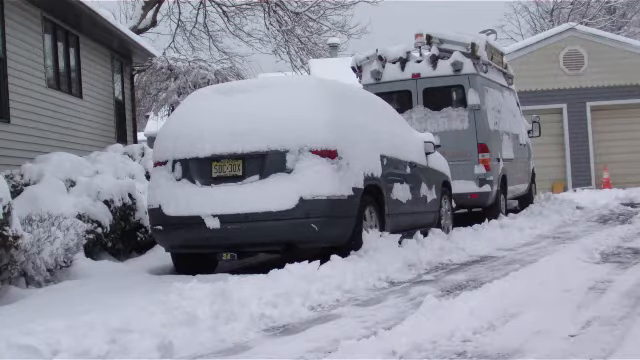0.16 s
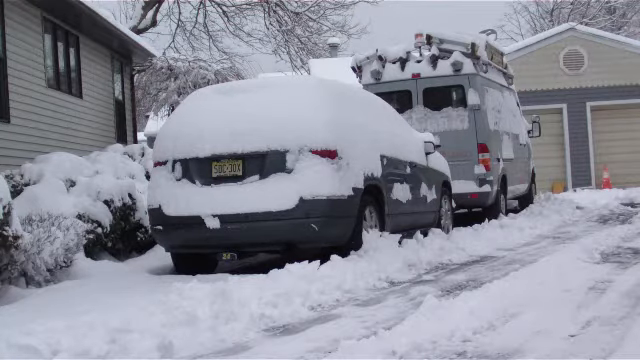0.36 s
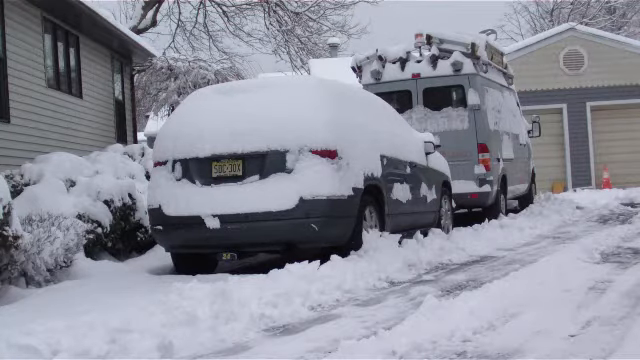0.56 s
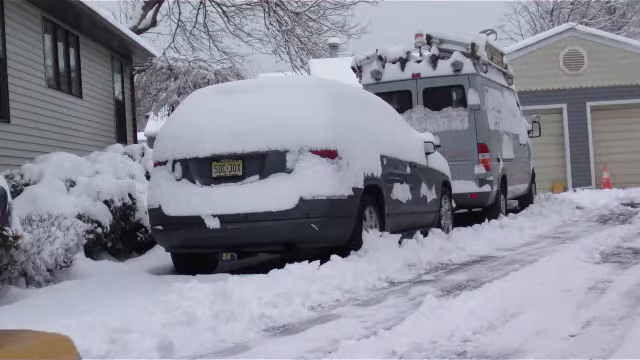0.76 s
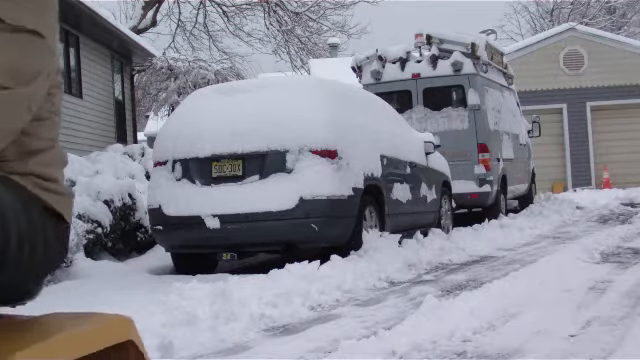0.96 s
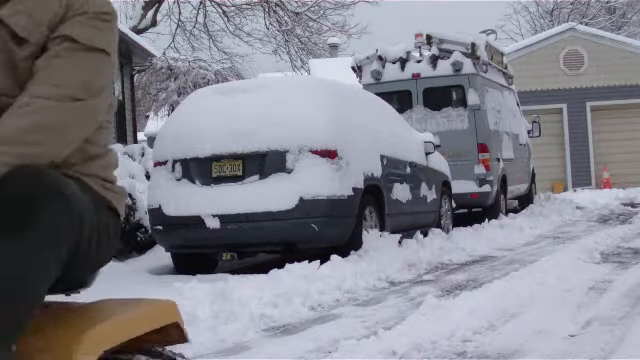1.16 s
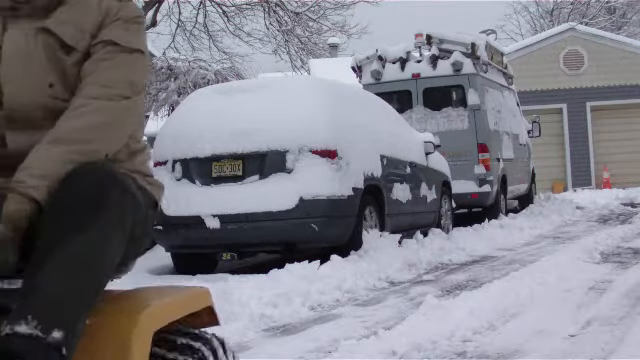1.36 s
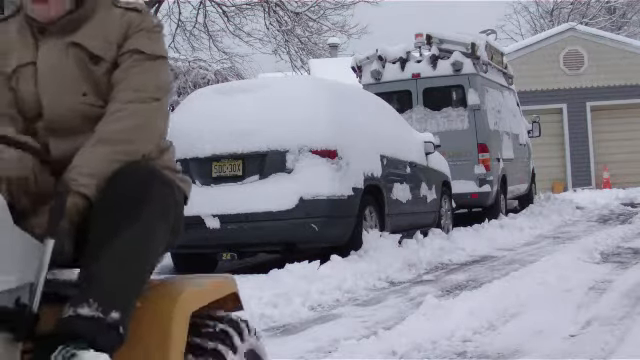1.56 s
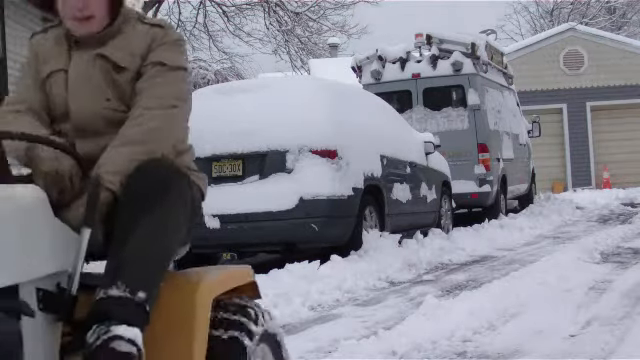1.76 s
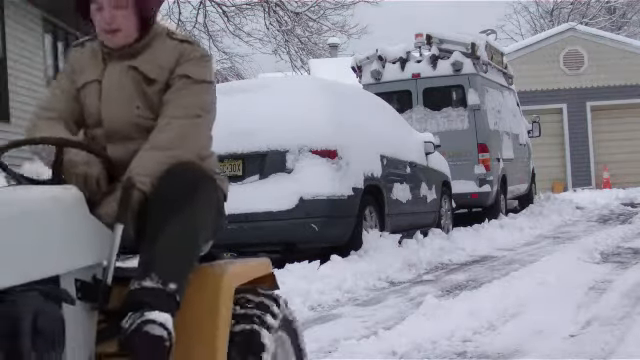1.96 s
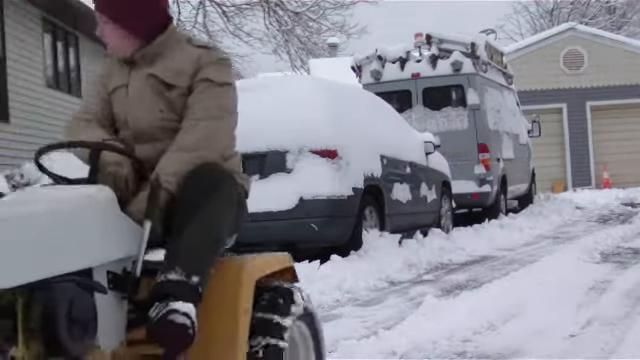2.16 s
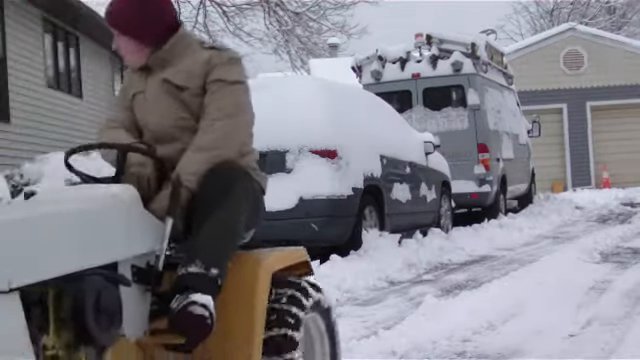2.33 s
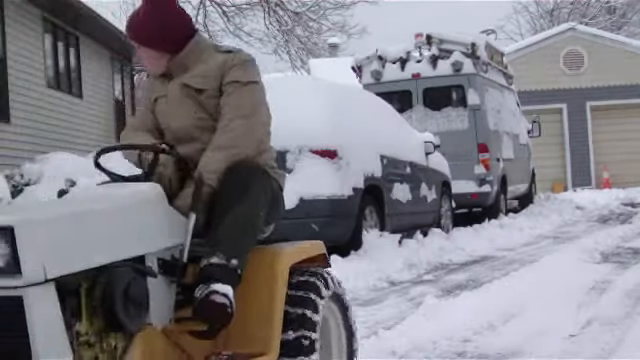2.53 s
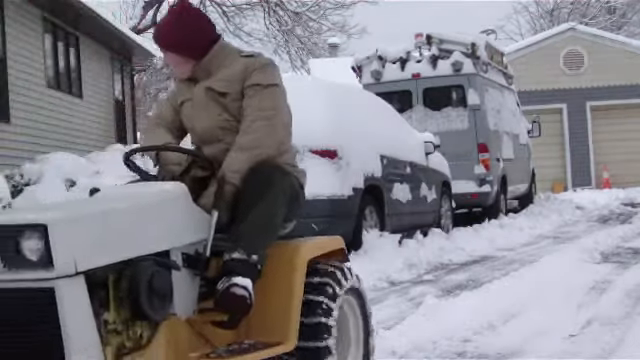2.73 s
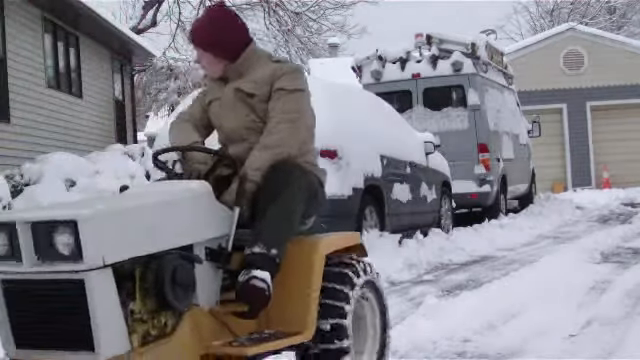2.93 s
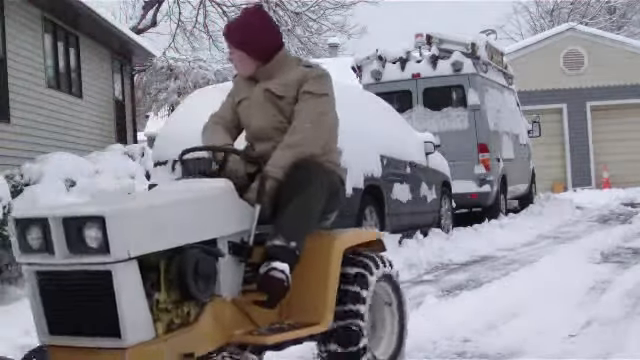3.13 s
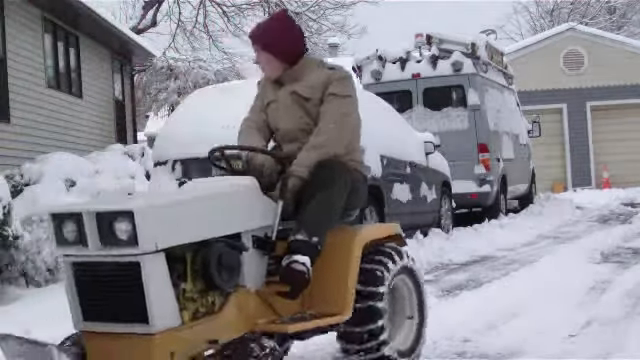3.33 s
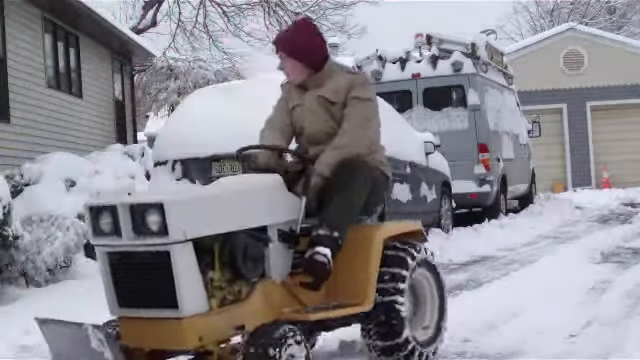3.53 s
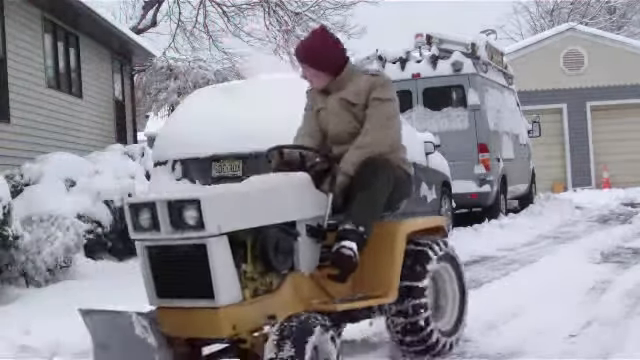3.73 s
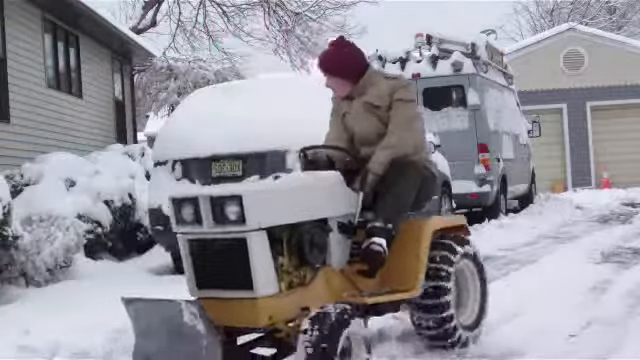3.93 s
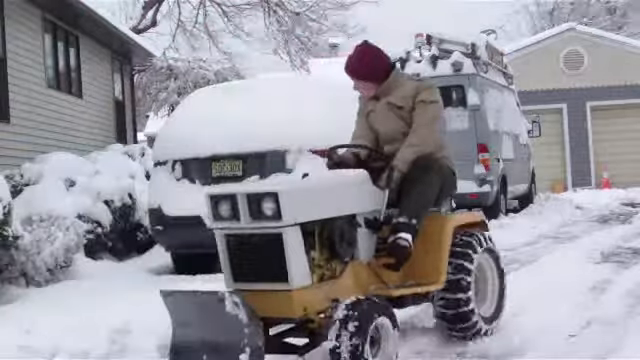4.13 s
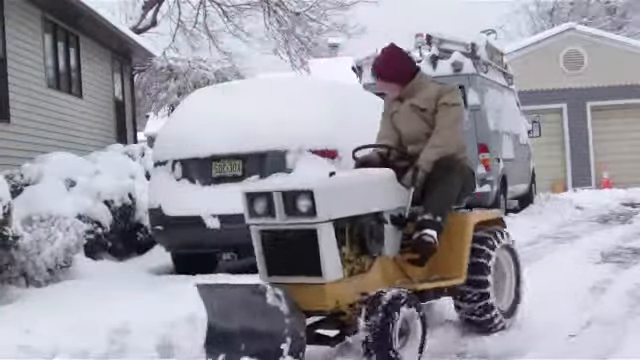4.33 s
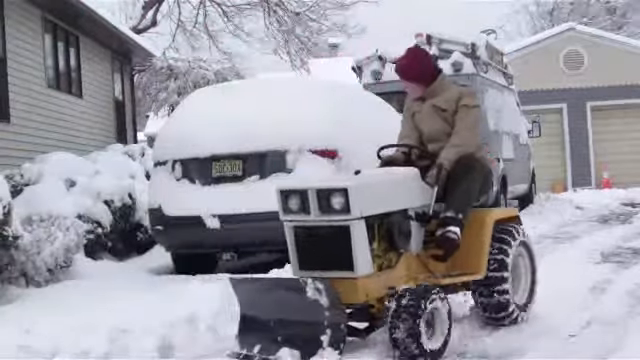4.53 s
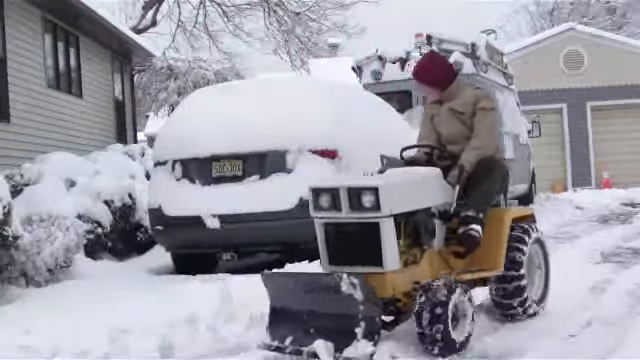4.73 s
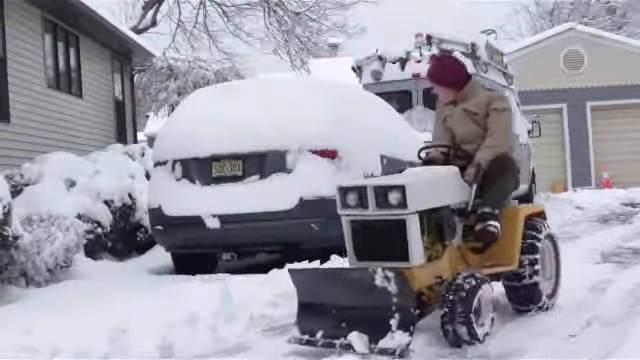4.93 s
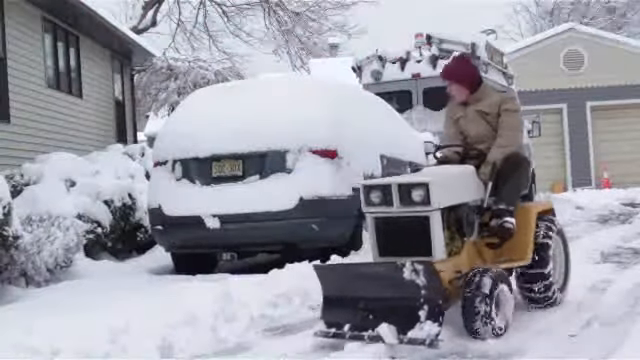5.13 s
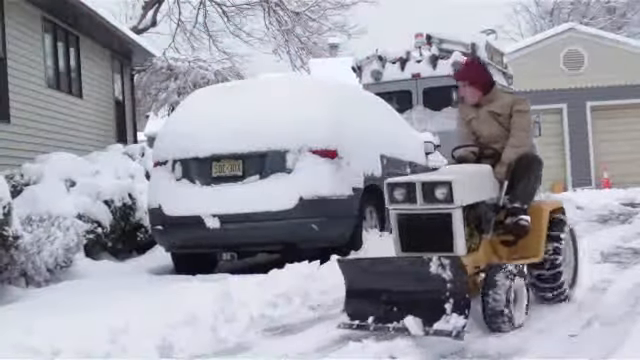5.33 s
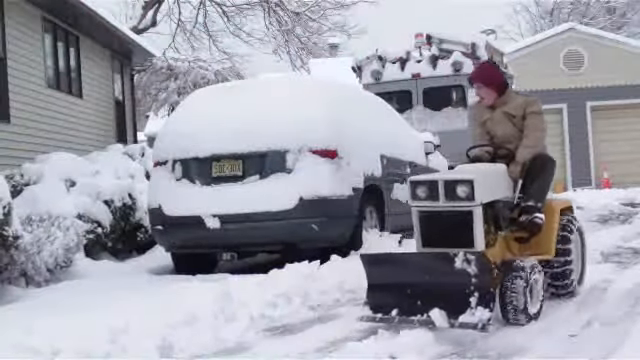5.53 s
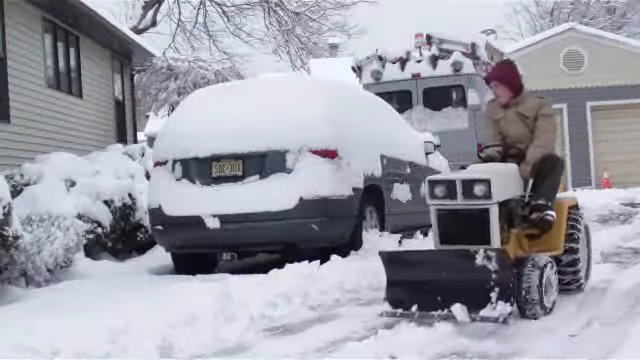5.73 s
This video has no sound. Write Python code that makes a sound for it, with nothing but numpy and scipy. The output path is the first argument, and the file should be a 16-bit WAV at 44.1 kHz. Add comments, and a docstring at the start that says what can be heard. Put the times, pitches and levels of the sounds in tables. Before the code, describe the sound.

A garden tractor with a snow blade passes close by, its engine thumping and belt chirping, then fades amid hissing snow and clinking tyre chains.

```python
"""Exhaust thumps, belt chirps and snow hiss swell and fade as a garden tractor backs past close by with its blade.
Each four-stroke cycle of its single cylinder sets off a resonant exhaust thump with a spit of gas,
two chirps of a belt with overtones and a gulp of intake air; casing and fan ring with rattle and knocks.
Each engine part swells as it comes abreast and fades with distance; intake and belt also fade behind bodywork.
Grainy noise makes the snow hiss in shoves, tyre chains clink, and the loudest peaks round off."""
import sys
import numpy as np
from scipy import signal
from scipy.fft import rfft, irfft
from scipy.io import wavfile

SR = 44100
rng = np.random.default_rng(int(sys.argv[2]) if len(sys.argv) > 2 else 0)


def generate_wav(signal):
    """Clip the signal to [-1, 1] and save it as 16-bit WAV at the path in sys.argv[1]."""
    frames = np.transpose(np.atleast_2d(signal))
    scaled = np.clip(frames, -1, 1) * 32767
    pcm = np.round(scaled).astype(np.int16)
    wavfile.write(sys.argv[1], SR, pcm)


N = 254898

# the governor hunts slowly: (time [s], engine cycles [1/s])
SPEED = [(0.0, 20.17), (0.44, 20.3), (1.13, 19.82), (1.33, 20.18), (2.38, 20.43), (3.96, 19.78),
         (5.03, 20.36), (5.4, 20.76), (5.78, 20.33)]
# how the tractor stands to the listener: (time [s], facing [0 = close and side on, 1 = seen from the front])
FACING = [(0, 0), (1.7, 0), (2.8, .45), (4, 1), (5.78, 1)]
# the engine pulls hard for a moment
PULL_AT_S, PULL_HALF_S = 0.64, 0.43


def amp(db):
    """Decibels to gain."""
    return 10 ** (np.asarray(db) / 20)


def unit(x):
    """Scales to rms 1."""
    return x / np.sqrt(np.mean(x ** 2) + 1e-20)


def curves(rows):
    """Each column of a table, after the time, as a value per sample."""
    s, *columns = np.transpose(rows)
    return [np.interp(np.arange(N) / SR, s, c) for c in columns]


def colour(x, points):
    """Filters by a spectrum drawn on a log-frequency axis, then scales to rms 1."""
    hz, db = np.transpose(points)
    f = np.fft.rfftfreq(N, 1 / SR)
    gain = amp(np.interp(np.log(f + 1), np.log(hz), db))
    return unit(irfft(rfft(x) * gain, N))


def wander(hz):
    """Smooth random drift of rms 1 that changes up to about hz times a second."""
    f = np.fft.rfftfreq(N, 1 / SR)
    lowpass = np.exp(-(f / hz) ** 2)
    return unit(irfft(rfft(rng.standard_normal(N)) * lowpass, N))


def resonate(x, hz, width):
    """One band-pass resonance of gain 1 at its centre; width in Hz."""
    return signal.lfilter(*signal.iirpeak(hz, hz / width, SR), x)


def ring(x, modes):
    """A body with several resonances, scaled to rms 1."""
    body = np.zeros(N)
    for hz, width, db in modes:
        # two passes narrow the peak, so each one is made wider
        once = resonate(x, hz, 2.4 * width)
        body += amp(db) * resonate(once, hz, 2.4 * width)
    return unit(body)


def stroke(cycle, at, length):
    """A smooth bump once a cycle, placed and sized in fractions of the cycle."""
    offset = (cycle - at + .5) % 1 - .5
    return np.exp(-(offset / length) ** 2)


def puff(cycle, at, length):
    """Once a cycle, a quick rise and a slower fall; times in fractions of the cycle."""
    age = (cycle - at) % 1 / length
    return age * np.exp(1 - age)


def per_cycle(cycle, spread_db):
    """A random gain for each cycle."""
    gains = amp(spread_db * rng.standard_normal(512))
    return gains[cycle.astype(int)]


def grains(per_s, spread_db):
    """Random clicks of either sign, mostly small and a few large, scaled to rms 1."""
    size = amp(spread_db * np.minimum(rng.exponential(1, N), 4))
    sign = rng.choice([-1, 1], N)
    return unit(size * sign * (rng.random(N) < per_s / SR))


def swell(at_s, half_s):
    """A smooth rise from 0 to 1 and back, at 1/e half_s away from its peak."""
    return np.exp(-((np.arange(N) / SR - at_s) / half_s) ** 2)


def shift(at_s, over_s):
    """A smooth change from 0 to 1."""
    return .5 + .5 * np.tanh((np.arange(N) / SR - at_s) / over_s)


def passing(abreast_s, nearest_m, falloff):
    """Level in dB of a part that drives by, 0 when abreast; falloff 1 is plain spreading, more is a sideways beam."""
    drive_m_per_s = 1.031
    along_m = drive_m_per_s * (np.arange(N) / SR - abreast_s)
    return -20 * falloff * np.log10(np.hypot(1, along_m / nearest_m))


def hiss(cycle):
    """Crunching snow and rushing air make a grainy hiss that throbs a little with the engine."""
    # the blade shoves a heap of snow: (time [s], half length to 1/e [s], level [dB])
    shove_rows = [(1.986, 0.12, -12.5), (2.81, 0.89, -16.5), (3.404, 0.31, -17.5), (4.203, 0.26, -23.5),
                  (4.658, 0.11, -25), (5.275, 0.24, -22), (5.553, 0.059, -19), (5.766, 0.057, -20.5)]
    # spectrum of the hiss: (frequency [Hz], level [dB])
    hiss_spectrum = [(800, -18), (2900, -4), (3650, 1.5), (4400, 0.5), (5700, 0.5), (6500, 3.5), (7200, 2),
                     (7800, 5), (9000, 3), (10100, -2.5), (11000, -6), (12200, -18.5), (13800, -13.5),
                     (15500, -19)]
    air_db = -11.2 + passing(abreast_s=1.22, nearest_m=0.44, falloff=1.8)
    slide_db = -21  # the blade slides steadily over the snow
    shove_power = sum((amp(db) * swell(s, half_s)) ** 2 for s, half_s, db in shove_rows)
    level = np.sqrt(amp(air_db) ** 2 + amp(slide_db) ** 2 + shove_power)
    crunch = grains(per_s=5000, spread_db=2.5)
    rush = rng.standard_normal(N)
    throb = 1 + 0.24 * stroke(cycle, at=0.39, length=0.089)
    # snow gives way in clumps
    clumps_db = .95 * wander(hz=55) + .6 * wander(hz=10)
    return level * amp(clumps_db) * unit(throb * colour(rush + 0.62 * crunch, hiss_spectrum))


def chains():
    """Links of the tyre chains strike and chatter briefly, each ringing in decaying, slightly detuned modes."""
    # the clear clinks: (time [s], peak level [dB])
    clink_rows = [(3.344, -15.5), (4.785, -9), (5.179, -3), (5.227, -9), (5.251, -5), (5.337, -7),
                  (5.591, -6), (5.722, -9), (5.76, -9.5)]
    # how a link rings: (frequency [Hz], level [dB], time to fall 60 dB [s])
    link_modes = [(3720, -8, .06), (4150, -13, .03), (6550, -3, .04), (7770, -4, .04), (9850, 0, .04),
                  (10200, -1, .035)]
    faint_per_s, faint_db = 3, -13
    faint_starts = np.flatnonzero(rng.random(N) < faint_per_s / SR)
    faint = [(n / SR, faint_db) for n in faint_starts]
    t = np.arange(SR // 8) / SR
    out = np.zeros(N + len(t))
    for s, db in clink_rows + faint:
        link = np.zeros(len(t))
        for hz, mode_db, t60 in link_modes:
            detuned_hz = hz * (1 + 0.01 * rng.standard_normal())
            link += amp(mode_db - 60 * t / t60) * np.sin(2 * np.pi * detuned_hz * t)
        chatter = rng.standard_normal(len(t)) * np.exp(-t / 0.01)
        ringing = unit(signal.fftconvolve(link, chatter)[:len(t)])
        clink = ringing + 0.28 * unit(resonate(chatter, hz=7300, width=2800))
        out[round(s * SR):][:len(t)] += amp(db) * clink / abs(clink).max()
    return out[:N]


def engine_bay(cycle):
    """Valve gear and piston knock on the casing; the flywheel fan rushes through its tin shroud."""
    # spectra of casing and fan: (frequency [Hz], level [dB])
    casing_spectrum = [(60, -24), (170, -1), (240, -3), (330, 7), (600, 3), (1000, 3), (1400, -1.5),
                       (2500, -13), (6000, -60)]
    fan_spectrum = [(200, -2), (800, -2), (1300, -1), (2000, 0.5), (2600, -1.5), (2950, -6), (3500, -4),
                    (5000, -21), (12000, -52)]
    # resonances of casing and shroud: (frequency [Hz], width before ring() widens it [Hz], level [dB])
    casing_modes = [(460, 26, -2.5), (588, 63, 0.5), (743, 39, 3), (857, 88, 0), (937, 71, -12)]
    shroud_modes = [(980, 73, 5), (1195, 18, 11.5), (1535, 160, 3), (1825, 114, 10), (2084, 18, 12.5),
                    (2440, 220, 0.5)]
    casing_db = -16.1 + passing(abreast_s=1.03, nearest_m=0.74, falloff=0.91)
    fan_db = -16.4 + passing(abreast_s=1.79, nearest_m=2.06, falloff=1.62)
    facing, = curves(FACING)
    # two single-sample knocks a cycle
    first_knock = np.diff(np.floor(cycle - .2), prepend=0)
    second_knock = np.diff(np.floor(cycle - .55), prepend=0)
    knocks = unit(first_knock + 1.06 * second_knock)
    # the casing rings out to the side, most while the open side of the bay faces the listener
    rattle_throb = 1 + 0.24 * puff(2 * cycle, at=0.31, length=0.073)
    rattle = unit(grains(per_s=3000, spread_db=1) * rattle_throb)
    casing_ring_db = -6.0 - 9 * facing + 5.3 * swell(at_s=2.1, half_s=0.4)
    casing_ring = amp(casing_ring_db) * ring(rattle + 1.4 * knocks, casing_modes)
    casing = unit(colour(rattle, casing_spectrum) + casing_ring)
    # the shroud rings through the grille in front
    air_throb = 1 + 0.19 * stroke(cycle, at=0.28, length=0.14)
    air = unit(grains(per_s=9000, spread_db=2) * air_throb)
    shroud_ring = amp(-13 + 3.7 * facing) * ring(air + 1.55 * knocks, shroud_modes)
    fan = unit(colour(air, fan_spectrum) + shroud_ring)
    return amp(casing_db + 0.72 * wander(hz=15)) * casing + amp(fan_db + 0.96 * wander(hz=25)) * fan


def intake(cycle):
    """About half a cycle after the exhaust, a gulp of air rings the air cleaner; it sinks and fades behind the hood."""
    hidden = shift(at_s=1.62, over_s=0.25)
    hz = 427 * (1 - .24 * hidden)
    level_db = -17.7 + passing(abreast_s=0.93, nearest_m=0.38, falloff=0.73) - 13 * hidden ** 2
    speed, = curves(SPEED)
    # the tone starts afresh with each gulp
    age_s = (cycle - .795) % 1 / speed
    tone = np.sin(2 * np.pi * hz * age_s + .5 * wander(hz=92.0))
    honk = puff(cycle, at=0.802, length=0.078) * tone
    return amp(level_db) * unit(honk * per_cycle(cycle, spread_db=1.2))


def belt(cycle):
    """The belt slips once in each turn of the crank: a rasping, unsteady chirp with overtones."""
    # the chirp and its overtones: (level [dB])
    partials_db = [3, 2, 0.5, -4.5]
    # rubber rubbing on the pulley: (frequency [Hz], level [dB])
    scuff_spectrum = [(1500, -22), (3500, -0.5), (5200, -4), (7000, 3.5), (10200, -9), (11500, -8),
                      (15000, -16)]
    speed, = curves(SPEED)
    facing, = curves(FACING)
    # the pitch follows engine speed, and rises once by 5 % as the belt tightens
    tightening = 1 + .05 * shift(at_s=1.87, over_s=.15)
    hz = 3310 * speed / speed.mean() * tightening
    hidden_db = -2.2 * shift(at_s=2.6, over_s=0.27) - 19 * facing ** 2
    level_db = -9.3 + passing(abreast_s=1.28, nearest_m=0.68, falloff=1.25) + hidden_db
    crank = 2 * cycle
    turns = np.cumsum(hz * (1 + .024 * wander(hz=500) + .016 * wander(hz=45))) / SR
    # each overtone jitters on its own, which smears it into a band
    squeal = np.zeros(N)
    for k, db in enumerate(partials_db, 1):
        roughness = 1 + 0.78 * wander(hz=402)
        squeal += amp(db) * roughness * np.sin(2 * np.pi * k * turns + 1.1 * wander(hz=210))
    scuff = colour(rng.standard_normal(N), scuff_spectrum)
    slip = (.27 + puff(crank, at=.69, length=.15)) * per_cycle(crank + .35, spread_db=1.1)
    return amp(level_db) * unit(slip * (unit(squeal) + 0.83 * scuff))


def spit(cycle):
    """With each thump a jet of gas spits from the outlet, whose rim rings; harder when the engine pulls."""
    # spectrum of the gas jet: (frequency [Hz], level [dB])
    gas_spectrum = [(600, -31), (2000, -7), (3000, -16), (5500, -3), (7000, 4.5), (8300, 6.5), (9100, 5),
                    (10000, 1.5), (12000, -8.5), (13500, -14), (15500, -29)]
    pull_db = 7 * swell(PULL_AT_S, PULL_HALF_S)
    level_db = -18.7 + passing(abreast_s=2.22, nearest_m=2.02, falloff=1.44) + pull_db
    jet = puff(cycle, at=0.15, length=0.036) + 0.5 * puff(cycle, at=0.233, length=0.025)
    force = per_cycle(cycle, spread_db=.9)
    gas = unit(force * jet * colour(rng.standard_normal(N), gas_spectrum))
    rim = ring(gas, [(8350, 92, 0)])
    return amp(level_db) * unit(gas + 0.24 * rim)


def thump(cycle):
    """The exhaust valve opens and a slug of gas rings the muffler and the pipe."""
    # the bass carries far, and dips for a while as the tractor turns its front to the listener
    turning_db = -3.0 * swell(at_s=3.17, half_s=.55)
    pull_db = 0.69 * swell(PULL_AT_S, PULL_HALF_S)
    level_db = -13.4 + passing(abreast_s=1.24, nearest_m=2.72, falloff=1.16) + pull_db + turning_db
    facing, = curves(FACING)
    firing = per_cycle(cycle, spread_db=0.1)
    slug = firing * stroke(cycle, at=.233, length=.078)
    boom = unit(resonate(slug, hz=29, width=20))
    low = unit(resonate(slug, hz=95, width=20))
    high = unit(resonate(slug, hz=129, width=38))
    pipe = unit((.45 + .07 * facing) * low - high)
    # the steep front of the slug reaches higher resonances, which radiate forwards
    front = firing * stroke(cycle, at=0.188, length=0.007)
    bark = unit(resonate(resonate(front, hz=198, width=19), hz=210, width=670))
    boom_gain = amp(-12 - 2.0 * facing)
    bark_gain = amp(-21.5 + 5.4 * facing)
    return amp(level_db) * (pipe + boom_gain * boom - bark_gain * bark)


def scene():
    """Everything on the engine follows the count of its cycles."""
    speed, = curves(SPEED)
    cycle = .646 + np.cumsum(speed) / SR
    engine = engine_bay(cycle) + intake(cycle) + belt(cycle) + spit(cycle) + thump(cycle)
    return (hiss(cycle) + chains() + engine)[None]


def record(dry):
    """The loudest peaks round off near full scale; then a low-pass limits the band."""
    edge_hz = 15450
    rounded = dry / (1 + abs(dry / 1.02) ** 6) ** (1 / 6)
    lowpass = signal.firwin(511, edge_hz, window=("kaiser", 8), fs=SR)
    return signal.oaconvolve(rounded, lowpass[None], "same")


dry = scene()
out = record(dry)
generate_wav(out)
```